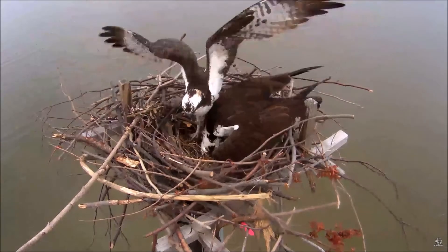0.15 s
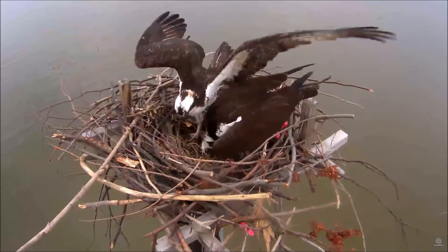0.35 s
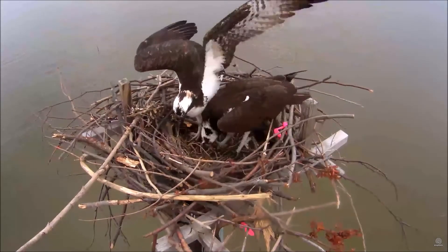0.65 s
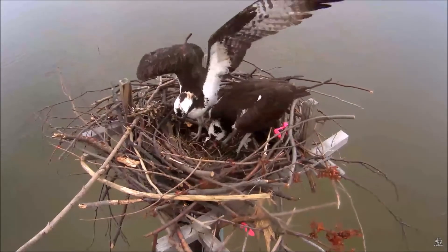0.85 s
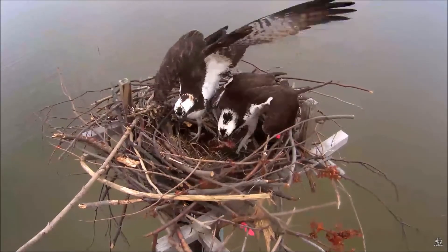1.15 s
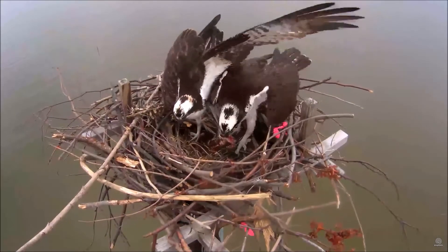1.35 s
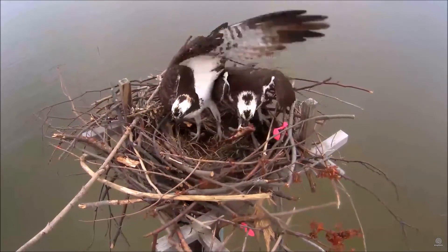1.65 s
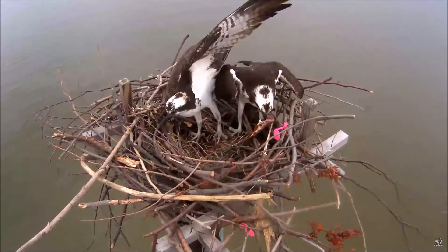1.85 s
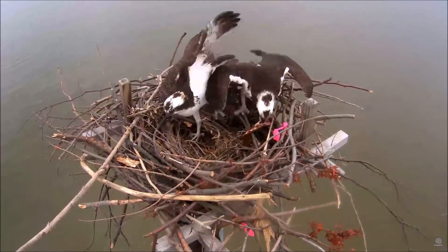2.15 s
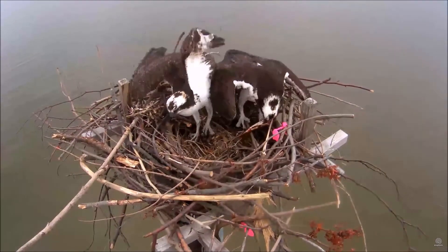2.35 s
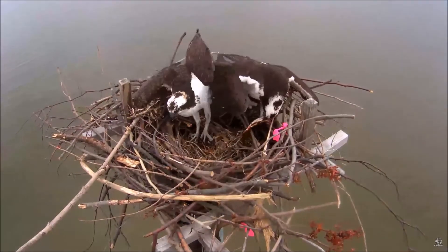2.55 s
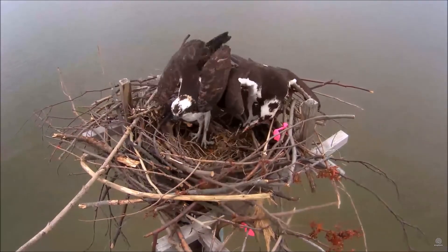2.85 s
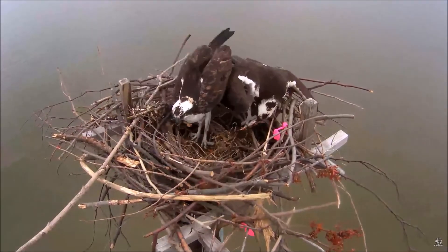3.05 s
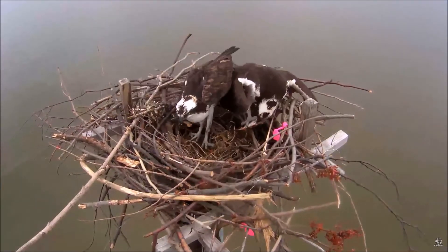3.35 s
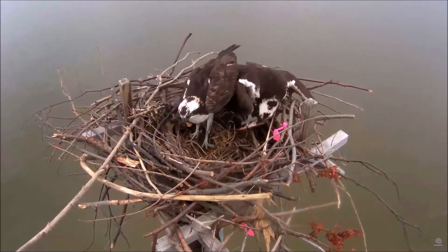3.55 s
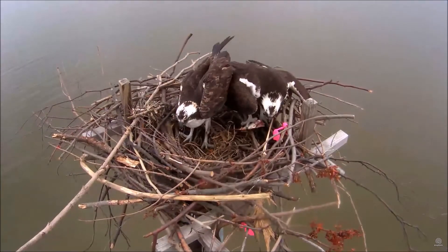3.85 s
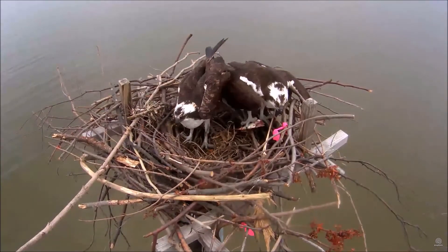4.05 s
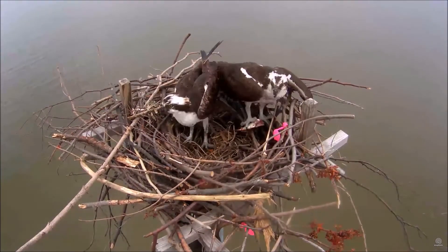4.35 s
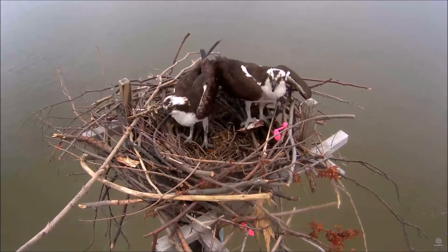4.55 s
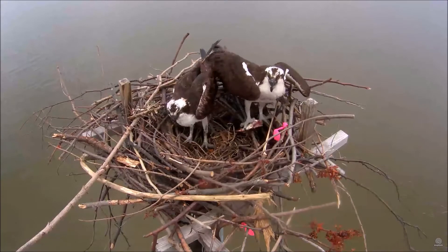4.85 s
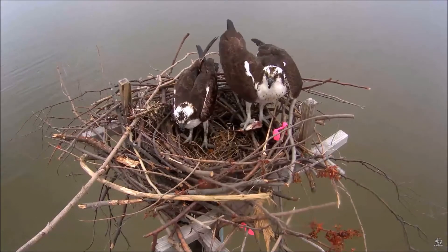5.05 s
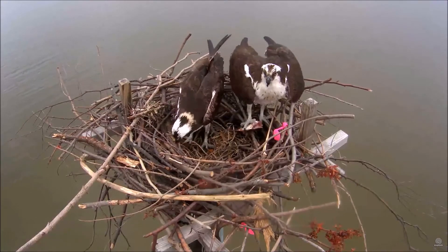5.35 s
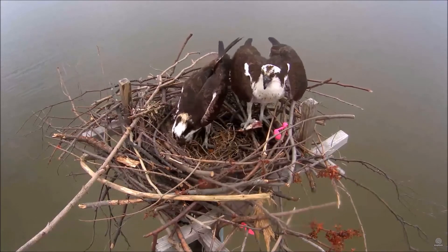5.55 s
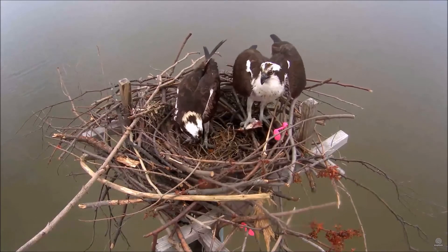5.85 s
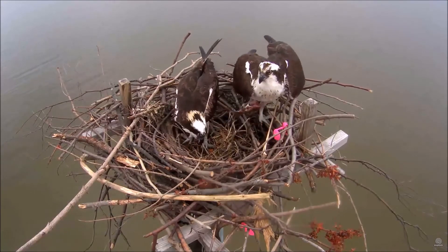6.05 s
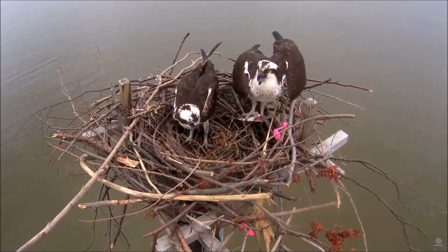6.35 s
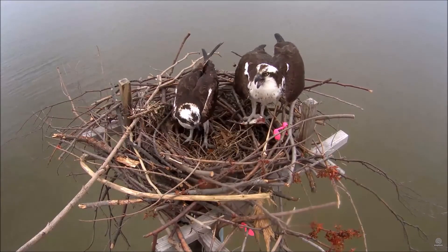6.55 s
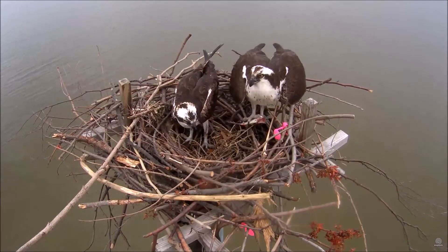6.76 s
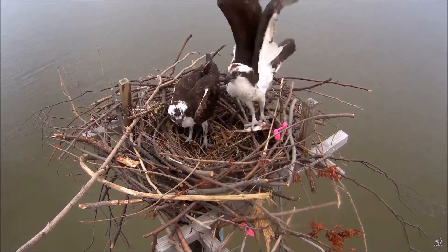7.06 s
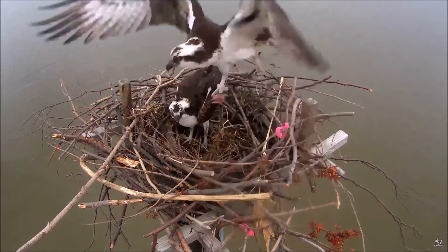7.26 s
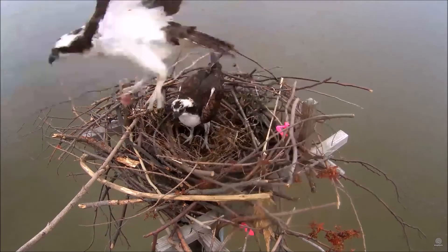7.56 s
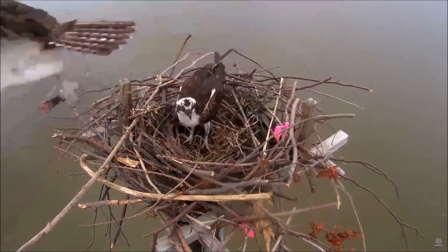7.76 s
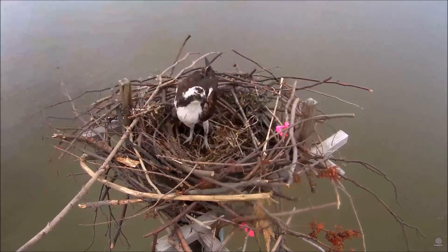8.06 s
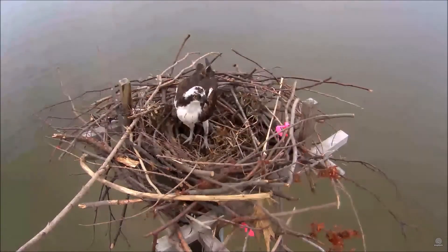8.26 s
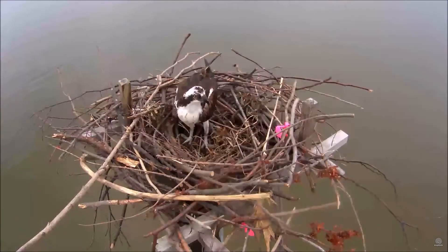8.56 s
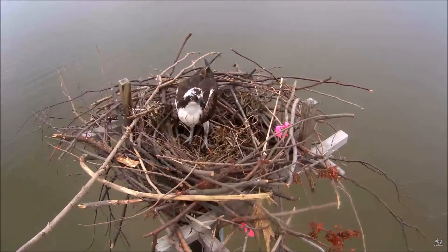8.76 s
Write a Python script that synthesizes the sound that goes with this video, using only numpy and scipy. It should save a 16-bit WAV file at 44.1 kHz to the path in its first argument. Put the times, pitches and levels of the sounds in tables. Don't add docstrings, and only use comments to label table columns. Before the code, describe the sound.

An osprey on a stick nest over water gives broken, hoarse squeals, then clear rising whistles, before wings flap off amid snapping twigs and a knock.

```python
import sys
import numpy as np
from scipy import signal
from scipy.fft import rfft, irfft, next_fast_len
from scipy.io import wavfile
from scipy.ndimage import uniform_filter1d, map_coordinates

SR = 44100
rng = np.random.default_rng(int(sys.argv[2]) if len(sys.argv) > 2 else 0)


def undo_db(level):
    steps = np.asarray(level, float) / 20
    return 10 ** steps


def wrap_up_sound(samples):
    columns = np.atleast_2d(samples).T
    tamed = np.clip(columns, -1, 1)
    steps = np.round(tamed * 32767).astype(np.int16)
    wavfile.write(sys.argv[1], SR, steps)


N = 393350
T = np.arange(N) / SR

# start_s, pitch_hz, level_db
SQUEALS = [
    [(.134, 3580, -58), (.15, 3675, -50), (.26, 3715, -53), (.32, 4050, -50), (.39, 4050, -61),
     (.418, 3480, -61)],
    [(.565, 3750, -64), (.59, 3460, -61), (.62, 3455, -54), (.672, 3410, -66)],
    [(.68, 3470, -42), (.7, 3740, -54.5), (.745, 3590, -40), (.856, 3814, -47.5), (.898, 3440, -46.5)],
    [(1.128, 3470, -45), (1.14, 3753, -25), (1.172, 3694, -32.5), (1.203, 3500, -55)],
    [(2.208, 3310, -43), (2.26, 3630, -57), (2.291, 4080, -38.5), (2.33, 3470, -59.5)],
    [(2.93, 3160, -58), (2.95, 3500, -67), (2.965, 3810, -51), (2.992, 3990, -38.5), (3.0, 4020, -31.5),
     (3.092, 3943, -35), (3.12, 3864, -28), (3.14, 3780, -34.5)],
]
# roughness (pitch and level shake), halfway_line_db (relative)
SQUEAL_HOARSENESS = [(3.5, -4), (2, 0), (.9, -6), (.7, -12), (2.5, -30), (.5, -24)]
# start_s, pitch_hz, level_db
STRANDS = [
    [(.122, 5060, -58), (.16, 5400, -63), (.22, 5200, -55), (.39, 5490, -53), (.416, 5080, -57)],
    [(.29, 5900, -61), (.33, 5890, -47), (.375, 6000, -39.5), (.395, 5930, -66)],
    [(.878, 7000, -64), (.888, 7000, -49), (.897, 7000, -58)],
    [(2.235, 5120, -56.5), (2.27, 5200, -54.5), (2.285, 5000, -57), (2.3, 5200, -42), (2.32, 4950, -49)],
    [(2.958, 4990, -38.5), (2.99, 5080, -39), (3.005, 5250, -47.5)],
    [(3.112, 6770, -50), (3.138, 6820, -43), (3.146, 6900, -45)],
    [(3.165, 5630, -45), (3.19, 5090, -61.5)],
    [(.138, 6880, -58), (.25, 6900, -58), (.39, 6780, -59), (.415, 6860, -63)],
    [(.572, 5010, -54), (.582, 5100, -50.5), (.6, 5150, -60), (.65, 5120, -56)],
    [(3.128, 6050, -50), (3.137, 6000, -31), (3.146, 5950, -46)],
    [(3.105, 2900, -51.5), (3.135, 2950, -33.5), (3.146, 2840, -36.5)],
]
STRAND_ROUGHNESS = [4.5, 2.5, 1.5, 4, 2, 1.5, 1.5, 5, 3, 1.5, 4]
# start_s, pitch_hz, beak_opening_db
WHISTLES = [
    [(4.597, 2193, -13), (4.636, 2379, 11), (4.72, 2491, -3.5), (4.765, 2631, 1.5), (4.82, 2702, -3),
     (4.85, 2750, 2), (4.945, 2823, 0.5), (4.96, 2726, 8.5), (4.986, 2510, -12)],
    [(5.627, 2223, 9), (5.665, 2412, 0), (5.75, 2598, 0.5), (5.804, 2688, 1), (5.84, 2749, 2.5),
     (5.896, 2793, -7), (5.968, 2829, -6), (5.99, 2700, 8.5), (6.012, 2490, -15)],
    [(6.404, 2300, 5), (6.452, 2530, 5), (6.498, 2540, -1.5), (6.53, 2640, 0), (6.608, 2752, -6.5),
     (6.628, 2790, -5), (6.724, 2868, -1.5), (6.742, 2688, -1), (6.76, 2520, -13.5)],
]
# pitch_hz, level_db
PIPE_FUNDAMENTAL = [(2200, -55), (2400, -42.5), (2520, -29), (2680, -23), (2715, -25), (2750, -36),
                    (2785, -22), (2860, -23.5)]
# pitch_hz, level_db
PIPE_OCTAVE = [(2200, -54), (2380, -40), (2520, -34), (2720, -24), (2860, -27.5)]
# start_s, pitch_hz, level_db, octave_db
BROKEN = [
    [(7.024, 2204, -55, -67), (7.036, 2364, -50, -30.5), (7.054, 2442, -34.5, -50.5),
     (7.072, 2538, -27.5, -29.5), (7.126, 2552, -29.5, -30.5), (7.132, 2572, -30.5, -34.5),
     (7.154, 2667, -26.5, -24.5), (7.17, 2680, -24.5, -21), (7.176, 2720, -30, -40.5)],
    [(7.174, 2702, -28.5, -34.5), (7.188, 2840, -33.5, -33), (7.196, 2783, -35, -33.5),
     (7.2, 2924, -45.5, -46), (7.204, 2800, -45, -42)],
    [(7.204, 2790, -39, -41.5), (7.21, 2743, -30, -23.5), (7.218, 2680, -25, -14.5),
     (7.232, 2690, -31, -40), (7.24, 2640, -29, -22), (7.248, 2421, -37.5, -56), (7.268, 2350, -63, -61)],
]
# start_s, pitch_hz, level_db, octave_db
STEADY = [
    [(3.613, 2603, -46, -60), (3.621, 2622, -25, -31), (3.65, 2678, -19.5, -27.5),
     (3.73, 2689, -21.5, -27.5), (3.76, 2705, -25.5, -28), (3.835, 2729, -25, -28), (3.862, 2810, -35, -33),
     (3.885, 2835, -39, -34.5), (3.906, 2806, -45, -36)],
    [(3.902, 2835, -41.5, -39), (3.912, 2772, -39, -35), (3.924, 2787, -30.5, -26.5),
     (3.938, 2763, -23.5, -23.5), (3.954, 2681, -24.5, -31.5), (3.962, 2650, -26.5, -51),
     (3.972, 2630, -50, -67)],
    [(8.188, 1940, -58, -60), (8.231, 2080, -43, -53.5), (8.275, 2040, -68, -80)],
]
# start_s, pitch_hz, level_db, octave_db
CHIRP = [
    [(8.084, 2340, -66, -91.5), (8.102, 2270, -51, -61), (8.128, 2422, -35, -56.5),
     (8.144, 2483, -32.5, -56), (8.152, 2458, -30, -52), (8.182, 2447, -32, -55), (8.192, 2435, -31, -55),
     (8.198, 2420, -41, -72), (8.224, 2410, -69.5, -67)],
    [(8.222, 2540, -65.5, -83), (8.238, 2560, -39, -48.5), (8.254, 2560, -37, -43.5),
     (8.264, 2456, -33.5, -55), (8.272, 2450, -46.5, -66), (8.28, 2570, -40.5, -57),
     (8.286, 2470, -50.5, -65), (8.296, 2470, -54, -92), (8.302, 2575, -72, -85)],
]
# start_s, pitch_hz, level_db, octave_db
HELD = [
    [(1.203, 3420, -61, -56), (1.213, 3110, -37, -63), (1.248, 2870, -36.5, -55.5), (1.29, 3200, -41, -51),
     (1.32, 3180, -47.5, -74.5), (1.338, 3540, -82, -45.5)],
    [(1.878, 2790, -54.5, -44), (1.89, 2900, -36, -41.5), (1.99, 2927, -37, -42), (2.02, 2962, -35, -29),
     (2.148, 3009, -38.5, -38.5), (2.16, 3143, -27, -51.5), (2.196, 3216, -26, -54.5),
     (2.214, 3150, -51.5, -70)],
    [(2.72, 2700, -35.5, -62), (2.734, 2810, -36, -40), (2.752, 2835, -41, -41.5), (2.833, 2823, -46, -42),
     (2.864, 2784, -33.5, -45), (2.886, 2830, -49, -71), (2.93, 3120, -43.5, -47)],
]
# peak_s, pitch_hz, glide_hz_per_s, level_db, octave_db
OPENERS = [
    (0.916, 2543, -9000, -36, -42.5),
    (1.109, 2593, 14994, -32.5, -32),
    (1.126, 2797, 9002.5, -35.5, -57),
    (1.467, 2920, -12000, -33.5, -47),
    (1.874, 2067, 7991, -34.5, -42.5),
    (2.325, 2362, -1500, -42, -34.5),
    (2.716, 2046, 5000, -42.5, -48.5),
]
# peak_s, pitch_hz, rise_s, level_db, octave_db
CLOSERS = [
    (.001, 2610, 0.011, -33, -47),
    (0.901, 2658, 0.011, -29, -34),
    (1.491, 2710, 0.018, -26, -26.5),
    (2.348, 2683, .012, -24, -39.5),
    (3.155, 2703, .02, -23, -25),
]
# start_s, end_s, depth_db, pitch_share (ratio)
FLUTTER = [(2.347, 2.37, -21.5, .28), (3.163, 3.19, -19, 0.3), (3.618, 3.939, -35, .27),
           (3.95, 3.979, -18, .27), (4.661, 4.812, -35.5, .225), (4.815, 4.947, -29, .215),
           (4.944, 4.987, -27.5, .25), (5.653, 5.69, -32.5, .235), (5.688, 5.76, -21.5, 0.18),
           (5.8, 5.984, -27, .235), (5.983, 6.019, -27.5, .25), (6.416, 6.515, -31.5, 0.2),
           (6.513, 6.596, -37.5, 0.34), (6.601, 6.73, -22.5, 0.25), (6.733, 6.767, -22.5, .27),
           (7.051, 7.168, -27, .235), (7.18, 7.212, -7.5, .28), (8.09, 8.21, -38.5, .2)]
# start_s, end_s, level_db, low_db, high_db (both relative)
BREATH = [(0.138, 0.414, -57, -3.5, 6), (0.573, 0.653, -58, -12.5, 1), (0.721, 0.912, -57, 1, -2),
          (1.108, 1.238, -45.5, -2.5, -3.5), (1.25, 1.328, -62, -5, -5), (1.335, 1.514, -50, 1, 1),
          (1.887, 2.188, -43, -3, -8.5), (2.19, 2.366, -43.5, -8.5, -9), (2.717, 2.959, -50, 2.5, 3),
          (2.95, 3.104, -42, -2, -8), (3.1, 3.145, -37.5, -2.5, -8.5), (3.147, 3.191, -48.5, 1, -10),
          (3.618, 3.825, -40.5, -11.5, -2.5), (3.816, 3.933, -39, -4, -1.5), (3.942, 3.984, -50.5, 2, -2),
          (7.038, 7.18, -41.5, -6, 3.5), (7.164, 7.28, -41.5, 1, 3)]
# centre_hz, width_hz, level_db
THROAT = [(2037, 130, -3), (2613, 370, 0), (3187, 110, -3), (3915, 310, -3.5), (4466, 110, 3.5),
          (4698, 210, 3), (5237, 190, 0), (6200, 190, -7), (6540, 390, -9), (6860, 260, -7),
          (6870, 590, -16.5)]
# start_s, length_s,
# level_db, pole_db, rustle_db (both relative)
BRUSHES = [
    (0.058, 0.077, -66, 8.5, 4),
    (1.51, 0.073, -68, -2, 0),
    (1.691, 0.029, -62.5, -15, 3),
    (1.729, .1, -61, 2, 0.5),
    (3.016, 0.026, -63.5, -1, 4.5),
    (3.711, 0.35, -68.5, -18, 4),
    (7.259, 0.21, -51, -1, -4),
    (7.314, 0.11, -58, -6, 0),
    (7.353, 0.02, -58, -6, 10),
    (7.39, 0.16, -60, -0.5, -4),
]
# start_s, length_s, level_db
FEATHERS = [
    (7.27, 0.11, -62),
    (7.318, 0.26, -66.5),
    (7.423, 0.18, -69),
    (7.558, 0.38, -65.5),
    (7.732, .15, -72),
]
# frequency_hz, level_db_per_hz
FEATHER_HISS = [(3000, -30), (4500, 1.5), (5600, -1), (7000, -3), (7900, -22)]
# time_s, bracket_db, pole_db (relative)
SHUFFLE = [
    (0.0, -75.5, 9),
    (0.72, -79.5, 10),
    (0.92, -62.5, 5),
    (5.48, -83, 13),
    (7.59, -77, 6),
    (8.91, -89.5, 12),
]
# start_s, length_s, level_db, pole_db (relative)
SCRAPES = [(0.703, 0.13, -54, 1), (0.809, 0.063, -67.5, 15.5), (1.224, 0.084, -57, -5),
           (1.318, 0.065, -59, 3), (1.527, 0.063, -65, 9), (1.553, 0.053, -57, -4),
           (1.753, 0.055, -47.5, -5.5), (2.142, 0.1, -55, -7.5), (4.132, 0.036, -63, -19),
           (5.759, 0.14, -69, 4.5), (6.044, 0.24, -66, -0.5), (6.636, 0.087, -64.5, 10.5),
           (6.915, 0.94, -64.5, -4), (7.491, 0.054, -62, 6)]
# centre_hz, width_hz, level_db
POLE = [(275.5, 19, 5.5), (447, 83, -4.5)]
# centre_hz, width_hz, level_db
BRACKET = [(738, 61, -2.5), (1113, 110, -9.5), (1212, 16, 4), (1636, 38, -10), (2300, 180, -13)]
# frequency_hz, level_db_per_hz
RUSTLE = [(120, -30.5), (250, -18.5), (1500, 1), (2500, -3.5), (3600, -16.5), (6000, -8.5), (7800, -30)]
# start_s, peak_db, crack_db, thud_db (both relative)
KNOCKS = [
    (2.091, -41, -25, 5.5),
    (3.934, -33.5, -26, 11),
    (6.306, -52, 4.5, -0.5),
    (6.607, -46.5, -30.5, 6),
    (7.823, -30.5, 15, 9),
]
# frequency_hz, level_db, t60_s
MOUNT_MODES = [(283, -13.5, 0.24), (372, -5, 0.054), (754, 1.5, 0.065), (1214, 1.5, 0.19), (1130, -2, 0.08),
               (1340, -5.5, 0.046), (1624, -7.5, 0.082), (2090, 2.5, 0.036)]
# frequency_hz, level_db_per_hz
CRACK = [(880, -72), (1500, -22), (2050, -10.5), (4600, -15), (5000, -16), (5610, -1.5), (7690, -18.5),
         (10000, -62), (16900, -120)]
# start_s, frequency_hz, peak_db, t60_s
TWIGS = [
    (1.804, 5600, -42, 0.02),
    (2.1, 200, -47.5, 0.085),
    (7.312, 346, -46, 0.17),
    (6.7, 2440, -23.5, 0.02),
    (7.358, 1654, -36.5, 0.095),
    (7.357, 2200, -37, 0.047),
    (7.361, 1198, -33, 0.059),
    (7.476, 1950, -48, .04),
    (7.383, 2430, -32.5, 0.035),
    (7.475, 766, -30.5, 0.056),
]
# start_s, peak_db
CRACKLES = [
    (1.691, -54),
    (1.739, -51),
    (1.752, -49),
    (1.772, -48),
    (7.323, -45),
    (7.345, -41),
    (7.368, -44),
    (7.415, -47),
    (7.44, -46),
]
# time_s, level_db
GUST = [(0, -82), (2.3, -71), (2.45, -60), (2.7, -77.5), (7, -85.5), (7.4, -64), (7.9, -74), (8.1, -84),
        (8.92, -88)]
# frequency_hz, level_db_per_hz
AIR = [(15, -52.5), (25, -31), (108, -7.5), (151, -5.5), (281, -6.5), (433, -7.5), (808, -12),
       (1130, -18.5), (1440, -16.5), (5770, -17), (7690, -18.5), (10000, -49.5), (16900, -120)]
# centre_hz, width_hz, level_db
WHINE = [(6020, 60, 0.5), (5600, 260, -3), (2720, 22, -14.5)]
# start_s, end_s, low_hz, high_hz
HOLES = [
    (3.63, 3.81, 3050, 3700),
    (3.89, 4.02, 3250, 3550),
    (4.66, 4.73, 2850, 3200),
    (6.52, 6.59, 3050, 3600),
    (8.17, 8.28, 2900, 3100),
]
DROPS = [
    4.7863,
    4.8077,
]


def unit(x):
    return x / np.sqrt(np.mean(x ** 2) + 1e-20)


def filtered(x, response):
    m = next_fast_len(len(x) + SR // 2)
    return irfft(rfft(x, m) * response(np.fft.rfftfreq(m, 1 / SR)), m)[:len(x)]


def coloured(points):
    f, db = np.transpose(points)
    return lambda hz: undo_db(np.interp(np.log(hz + 1), np.log(f), db, -120, -120))


def resonant(peaks):
    def response(f):
        total = 0
        for k, (centre, width, db) in enumerate(peaks):
            damping = 1j * f * width
            total = total + (-1) ** k * undo_db(db) * damping / (centre * centre - f * f + damping)
        return total
    return response


def wobble(rate, size=N):
    knots = rng.standard_normal(int(size * rate / SR) + 4)
    coarse = np.arange(0, size + 16, 16)
    return np.interp(np.arange(size), coarse, map_coordinates(knots, [coarse * rate / SR]))


def gain(rows, axis=1):
    rows = np.array(rows)
    return undo_db(np.interp(T, rows[:, 0], rows[:, axis], -140, -140))


def gate(t, edge):
    return np.minimum(1, np.minimum(t - t[0], t[-1] - t) / edge)


def span(t0, t1):
    return slice(max(round(t0 * SR), 0), round(t1 * SR))


def voice():
    tone = sung_notes() + squeals()
    side = filtered(tone * flutter(), coloured([(1500, -34.0), (2000, -1.5), (3000, -15), (3600, -18.5),
                                                (4500, 3.5), (7000, 3.0), (8000, 9.5)]))
    call = tone + side + breath()
    return call + far_shore(call)


def sung_notes():
    broken_calls = list(HELD)
    for row in OPENERS:
        broken_calls.append(blip(*row, rise_s=0.011, glide_in=row[2], fall_s=0.012, square=2.1))
    for s, hz, rise_s, db, octave_db in CLOSERS:
        broken_calls.append(blip(s, hz, -5000, db, octave_db, rise_s, -198 / rise_s, fall_s=0.017, square=2.8))
    clear = STEADY[:2] + BROKEN + [whistle(rows) for rows in WHISTLES]
    tone = sum(note(rows, jitter_hz=8, third_db=-20.0, rough_db=2.5) for rows in broken_calls)
    tone += sum(note(rows, jitter_hz=6.0, third_db=-9.5) for rows in clear)
    tone += sum(note(rows, jitter_hz=7, third_db=-11.0, rough_db=4.5) for rows in STEADY[2:] + CHIRP)
    return tone


def note(rows, jitter_hz, third_db, rough_db=1.54):
    s, hz, *levels = np.transpose(rows)
    a, b = round(s[0] * SR), round(s[-1] * SR)
    cols = [hz, *undo_db(np.array(levels) / 2)]
    hz, one, two = (uniform_filter1d(np.interp(T[a:b], s, c), size=200, mode="nearest") for c in cols)
    turn = 2 * np.pi * np.cumsum(hz + jitter_hz * wobble(150, size=b - a)) / SR
    y = one ** 2 * undo_db(rough_db / 2 * wobble(70, size=b - a)) * np.sin(turn)
    octave_phase = np.pi * np.clip((hz - 2600) / 200, 0, 1)
    y -= two ** 2 * undo_db(rough_db * wobble(150, size=b - a)) * np.cos(2 * turn + octave_phase)
    y += two ** 2 * undo_db(third_db - abs(hz - 2330) / 33) * np.sin(3 * turn)
    return np.sqrt(2) * np.pad(y * gate(T[a:b], 0.0046), (a, N - b))


def whistle(rows):
    onset_s, onset_db, release_s, release_db = 0.0052, 25.5, 0.038, 9.5
    s, hz, beak_db = np.transpose(rows)
    t = np.arange(s[0], s[-1], .002)
    hz = uniform_filter1d(np.interp(t, s, hz), size=9, mode="nearest")
    onset = np.clip(1 - (t - s[0]) / onset_s, 0, 1)
    release = np.clip(1 - (s[-1] - t) / release_s, 0, 1)
    edge_db = -onset_db * onset - release_db * release ** 2
    edge_db += 6 * release * rng.standard_normal(len(t))
    one, two = (np.interp(hz, *np.transpose(pipe)) + edge_db for pipe in (PIPE_FUNDAMENTAL, PIPE_OCTAVE))
    return np.transpose([t, hz, one, two + np.interp(t, s, beak_db)])


def blip(s, hz, glide, db, octave_db, rise_s, glide_in, fall_s, square):
    t = np.arange(max(-s, -1.3 * rise_s), 1.3 * fall_s, .002)
    swell_db = -20 * abs(t / np.where(t < 0, rise_s, fall_s)) ** square
    pitch_hz = hz + np.where(t < 0, glide_in, glide) * t
    return np.transpose([s + t, pitch_hz, db + swell_db, octave_db + 1.7 * swell_db])


def squeals():
    tone = sum(squeal(rows, rough, half_db=-28) for rows, rough in zip(STRANDS, STRAND_ROUGHNESS))
    return tone + sum(squeal(rows, *hoarse) for rows, hoarse in zip(SQUEALS, SQUEAL_HOARSENESS))


def squeal(rows, rough, half_db):
    s, hz, one_db = np.transpose(rows)
    a, b = round(s[0] * SR), round(s[-1] * SR)

    def smooth(column):
        return uniform_filter1d(np.interp(T[a:b], s, column), size=600, mode="nearest")

    turn = 2 * np.pi * np.cumsum(smooth(hz) + 11 * rough * wobble(330, size=b - a)) / SR
    y = (1 + 0.25 * rough * wobble(250 + 30 * rough, size=b - a)) * np.sin(turn)
    y += undo_db(half_db) * wobble(350, size=b - a) * np.sin(3 * turn / 2)
    y += undo_db(-30.5) * np.sin(2 * turn)
    return np.sqrt(2) * np.pad(y * undo_db(smooth(one_db)) * gate(T[a:b], 0.0058), (a, N - b))


def flutter():
    pitch_rows = [np.array(rows)[:, :2] for rows in STEADY[:2] + WHISTLES + BROKEN]
    pitch = np.interp(T, *np.concatenate(pitch_rows).T)
    beat = undo_db(-42.5 + 4.4 * wobble(15)) * wobble(1400)
    for t0, t1, db, share in FLUTTER:
        at = span(t0, t1)
        t = T[at]
        turn = 2 * np.pi * np.cumsum(share * pitch[at] + 22 * wobble(110, size=len(t))) / SR
        depth = 2 * undo_db(db + 2.0 + 2.7 * wobble(37, size=len(t))) * gate(t, 0.0088)
        beat[at] += depth * (np.sin(turn) + 0.29 * np.sin(2 * turn) + 0.27 * np.sin(3 * turn))
    return beat


def breath():
    parts = np.zeros((5, N))
    for peak in THROAT:
        band = filtered(rng.standard_normal(N), lambda f: resonant([peak])(f) ** 2 / undo_db(peak[2]))
        part = np.searchsorted([3500, 4200, 4600, 5600], peak[0])
        parts[part] += band * undo_db(1.8 * wobble(14) + 2.5 * wobble(60))
    parts /= np.std(parts[2] + parts[3])
    puffs = [(t0, t1, db, db, low_db, high_db) for t0, t1, db, low_db, high_db in BREATH]
    for rows, db in zip(WHISTLES, (-48.5, -45, -46.5)):
        s, hz = whistle(rows).T[:2]
        turn = s[np.argmax(hz > 2700)]
        puffs.append((s[0] + .02, turn, db - 8, db - 8.5, -1.5, 5.5))
        puffs.append((turn, s[-1] + 0.0044, db, db, -1.5, 5.5))
    out = np.zeros(N)
    for t0, t1, db0, db1, low_db, high_db in puffs:
        at = span(t0 - .004, t1 + .004)
        level = undo_db(np.interp(T[at], [t0, t1], [db0, db1])) * gate(T[at], 0.018)
        valley_db = -6 * (t0 > 3.5)
        out[at] += level * (undo_db([low_db, low_db + valley_db, valley_db, 0, high_db]) @ parts[:, at])
    return out


def far_shore(call):
    t = T[:SR]
    tail = undo_db(-60 * t / 1.6) + undo_db(27.5 - 60 * t / 0.091)
    tail += undo_db(4.5 - 6.8 * ((t - 0.25) / .05) ** 2)
    shore = unit(rng.standard_normal(SR) * tail) / np.sqrt(SR)
    sent = filtered(call, resonant([(2650, 240, -1.5), (2537, 50, 7.5)]))
    return undo_db(-30.5) * signal.fftconvolve(sent, shore)[:N]


def sticks():
    grains = rng.standard_normal((3, N)) * undo_db(1.2 * wobble(45) + 3 * wobble(200))
    bracket = unit(filtered(grains[0], resonant(BRACKET)))
    pole = unit(filtered(grains[1], resonant(POLE)))
    rustle = unit(filtered(grains[2] * undo_db(1.5 * wobble(27)), coloured(RUSTLE)))
    out = gain(SHUFFLE) * (undo_db(1.0) * bracket + undo_db(-5.0) * gain(SHUFFLE, axis=2) * pole)
    scrapes = [(*row, -17.5) for row in SCRAPES]
    for s, length, db, pole_db, rustle_db in BRUSHES + scrapes:
        at = span(s, s + 3 * length)
        u = (T[at] - T[at][0]) / length
        mix = bracket[at] + undo_db(pole_db) * pole[at] + undo_db(rustle_db) * rustle[at]
        out[at] += undo_db(db) * 4 * u * np.exp(1 - 3.99 * u) * mix
    hiss = unit(filtered(rng.standard_normal(N) * undo_db(4.4 * wobble(70)), coloured(FEATHER_HISS)))
    for s, length, db in FEATHERS:
        at = span(s, s + 3 * length)
        u = 4 * (T[at] - T[at][0]) / length
        out[at] += undo_db(db) * u * np.exp(1 - u) * hiss[at]
    return out


def knocks():
    out, t = np.zeros(N + SR), T[:SR // 2]
    for s, db, crack_db, thud_db in KNOCKS:
        level_draw, pitch_draw = rng.standard_normal((2, len(MOUNT_MODES)))
        ring = np.zeros(len(t))
        for (hz, level, t60), u, v in zip(MOUNT_MODES, level_draw, np.clip(pitch_draw, -1, 1)):
            decay = undo_db(level + 0.47 * u - 60 * t / t60 + thud_db * (hz < 500))
            ring += decay * np.sin(2 * np.pi * hz * (1 + v / 150) * t)
        crack = unit(filtered(rng.standard_normal(len(t)), coloured(CRACK))) * undo_db(crack_db - 60 * t / 0.04)
        out[round(s * SR):][:len(t)] += undo_db(db - 6.5) * (ring + crack) * (1 - np.exp(-t / 0.0015))
    return out[:N]


def twigs():
    out, t = np.zeros(N), T[:SR // 4]
    for s, hz, db, t60 in TWIGS:
        swell = 2 * undo_db(db - 60 * t / t60) * (1 - np.exp(-t / 0.0043))
        splinter = hz / 2500 * wobble(400, size=len(t))
        out[round(s * SR):][:len(t)] += swell * np.sin(2 * np.pi * hz * t + splinter)
    for s, db in CRACKLES:
        snap = unit(filtered(rng.standard_normal(len(t)), coloured(RUSTLE)))
        out[round(s * SR):][:len(t)] += undo_db(db - 60 * t / 0.032) * (1 - np.exp(-t / 0.00094)) * snap
    return out


def background():
    air = unit(filtered(rng.standard_normal(N), coloured(AIR))) * undo_db(-64.5 + .6 * wobble(3))
    whine = unit(filtered(rng.standard_normal(N), resonant(WHINE))) * undo_db(-70.0)
    wind_colour = coloured([(20, -14.5), (40, -2.5), (120, -4.0), (300, -15)])
    wind = unit(filtered(rng.standard_normal(N), wind_colour))
    return air + whine + undo_db(1.5 * wobble(7)) * gain(GUST) * wind


def scene():
    return (voice() + sticks() + knocks() + twigs() + background())[None]


def top_cut(x):
    return signal.sosfilt(signal.butter(12, 15730, fs=SR, output="sos"), x)


def record(dry):
    x = filtered(dry[0], lambda hz: undo_db(-40 * np.clip((hz - 7300) / 650, 0, 3) ** 2))
    for t0, t1, low_hz, high_hz in HOLES:
        at = span(t0, t1)
        band = filtered(x[at], lambda hz: (hz > low_hz) & (hz < high_hz))
        x = x - np.pad(.9 * gate(T[at], .01) * band, (at.start, N - at.stop))
    fade = np.ones(N)
    for s in DROPS:
        near = abs(x[round(s * SR):][:17])
        s += np.argmin(abs(near - .4 * near.max())) / SR
        fade = np.where(T >= s, np.clip((T - s) / 0.016, 0, 1), fade)
    x = filtered(x * fade, lambda hz: hz / (hz - 60j))
    dither = filtered(rng.standard_normal(N), coloured([(20, 5.0), (8000, 4.0), (16000, -3.5)]))
    x = x + undo_db(-94.0) * dither
    return top_cut(x[None])


dry = scene()
out = record(dry)
wrap_up_sound(out)
```